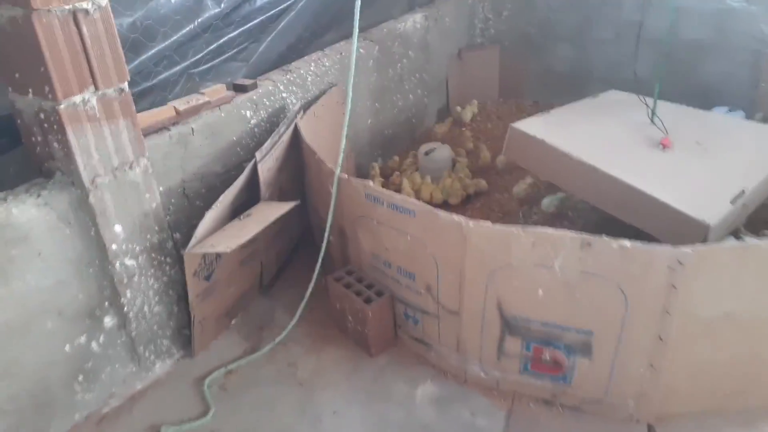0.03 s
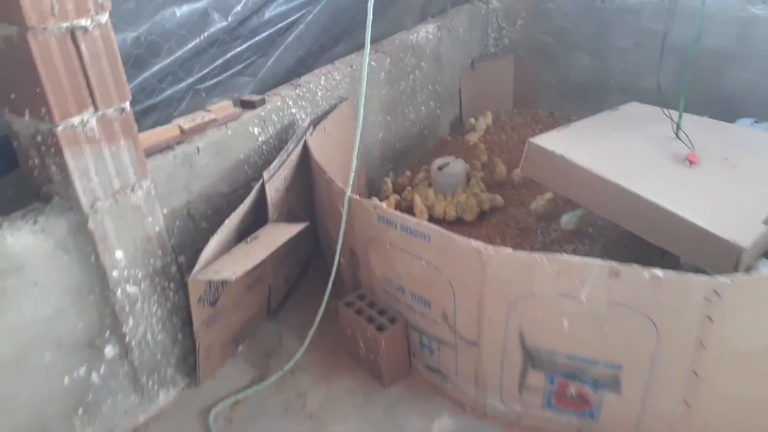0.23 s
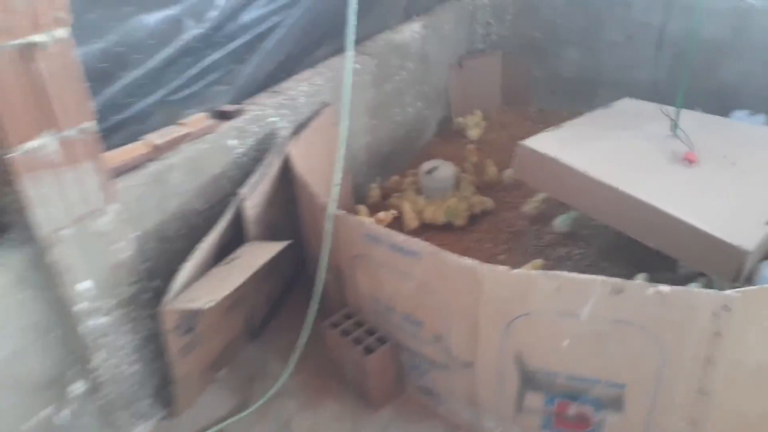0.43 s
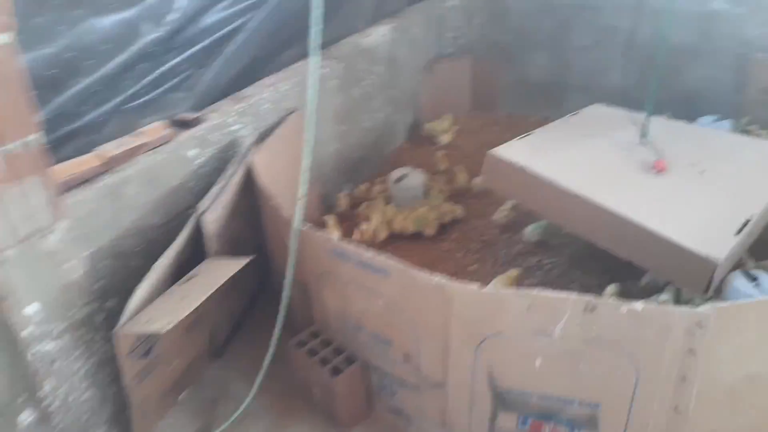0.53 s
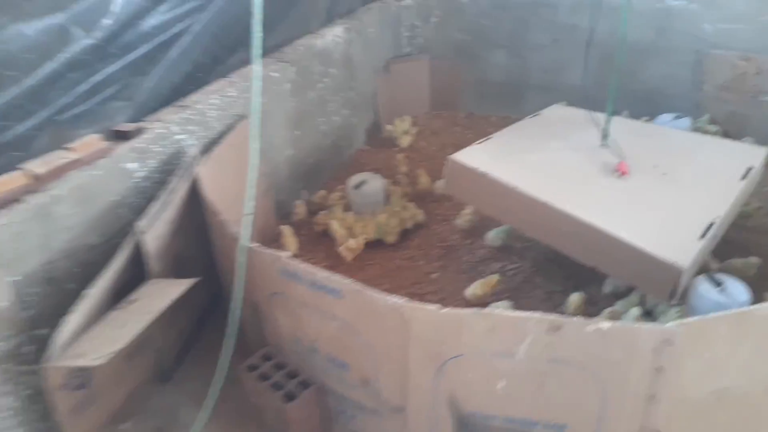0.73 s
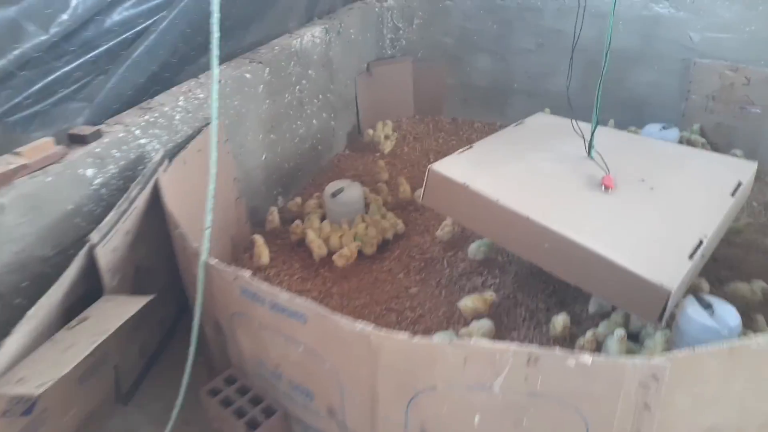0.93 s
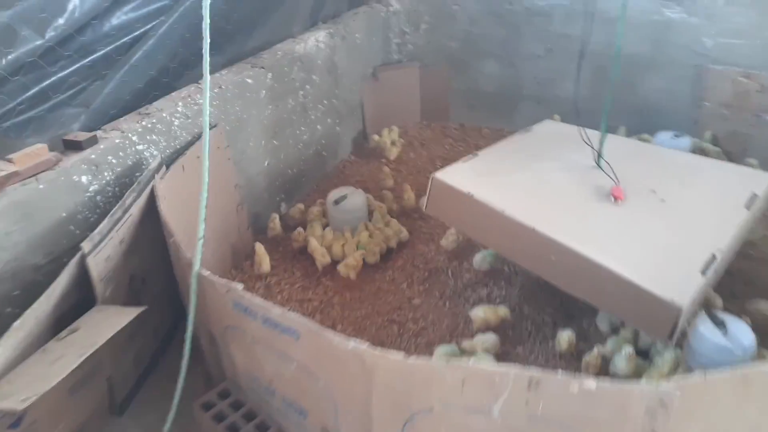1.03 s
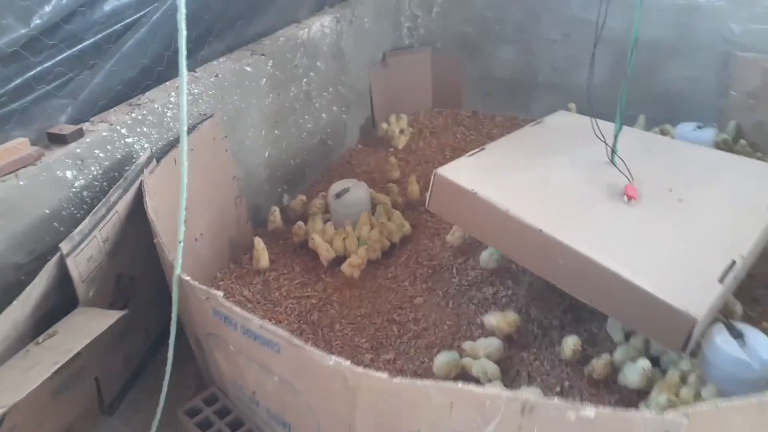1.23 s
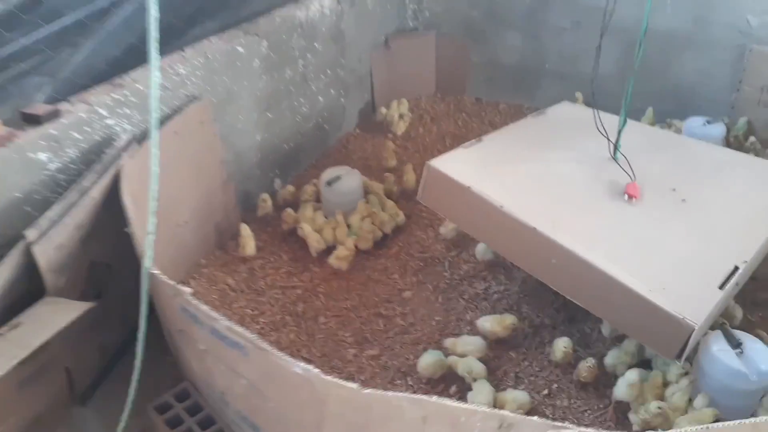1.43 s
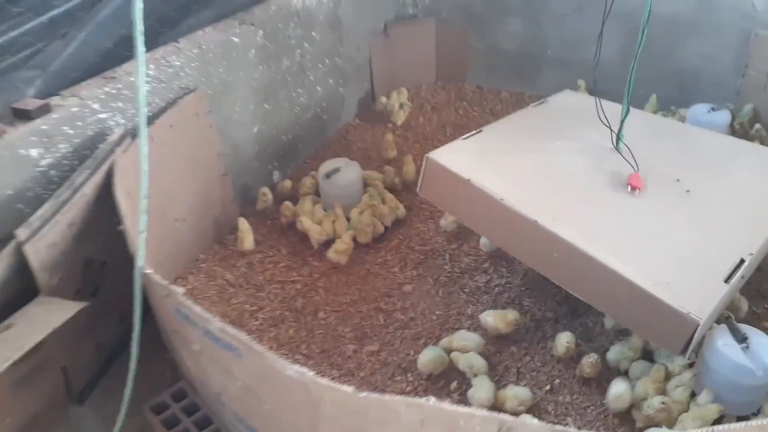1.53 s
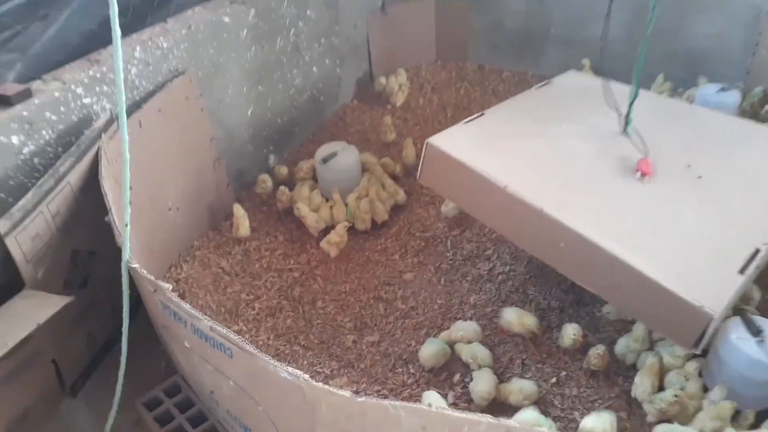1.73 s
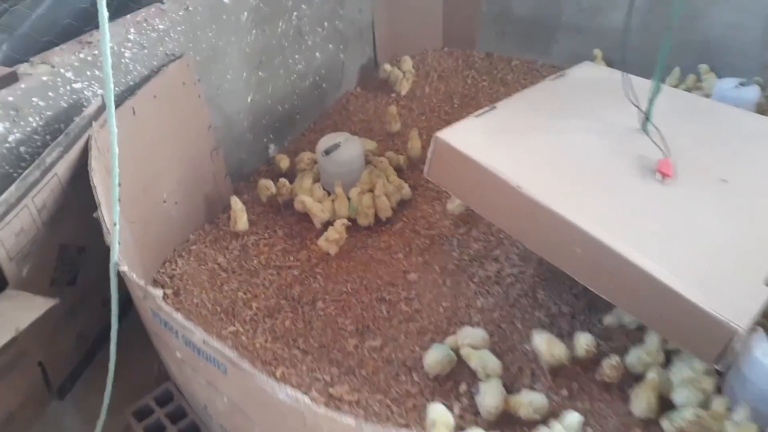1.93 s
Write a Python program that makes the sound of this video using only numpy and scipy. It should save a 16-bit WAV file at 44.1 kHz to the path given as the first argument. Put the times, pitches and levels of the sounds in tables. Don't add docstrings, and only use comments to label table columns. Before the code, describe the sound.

Constant chorus of baby chick peeps, short falling whistles and higher twitters, with short shed echo; light foot scuffs and gritty snaps, low air wash, distant engine drone and hiss, a soft microphone bump at the end.

```python
import sys
import numpy as np
from scipy import signal
from scipy.fft import rfft, irfft
from scipy.io import wavfile
from scipy.ndimage import uniform_filter1d

SR = 44100
rng = np.random.default_rng(int(sys.argv[2]) if len(sys.argv) > 2 else 0)


def magnitude_from_level(level_db):
    exponent = np.asarray(level_db, float) / 20
    return 10 ** exponent


def store_pcm(level_fs):
    pcm = np.round(np.clip(level_fs, -1, 1) * 32767).astype(np.int16)
    wavfile.write(sys.argv[1], SR, np.atleast_2d(pcm).T)


N = 88200

# start t/s, length t/s, top f/Hz, end f/Hz, level/dB
CHEEP_EVENTS = [(.212, 0.055, 3096, 2100, -41.5), (.33, 0.059, 3045, 2550, -43),
                (.368, 0.034, 3410, 2710, -44), (.392, 0.038, 2497, 2330, -31.5),
                (.4, 0.04, 2763, 2500, -42), (.405, 0.036, 2147, 1626, -43),
                (.562, 0.075, 4110, 2876, -42.5), (.63, 0.0696, 3364, 2905, -45.5),
                (.755, .05, 2900, 2600, -40), (.865, 0.046, 3300, 2420, -41), (.97, 0.045, 3443, 2950, -42),
                (1.028, 0.04, 2890, 2560, -39.5), (1.052, 0.042, 4300, 3530, -46),
                (1.11, .06, 2632, 1860, -52.5), (1.19, 0.1, 3080, 2640, -49.5),
                (1.315, 0.045, 3450, 3030, -43), (1.43, 0.066, 3310, 2760, -48.5),
                (1.53, 0.039, 2603, 2073, -46.5), (1.545, .06, 3590, 2970, -45),
                (1.615, .06, 3960, 3410, -41.5), (1.685, 0.056, 4070, 3600, -46),
                (1.7, 0.045, 2380, 1800, -55.5), (1.775, .045, 3220, 2456, -40.5),
                (1.915, 0.049, 3470, 2910, -41.5), (1.03, .035, 3120, 2800, -49),
                (.655, .05, 4240, 3850, -52), (.81, .06, 2658, 2350, -47), (.765, .04, 3200, 2800, -40),
                (1.36, .05, 3000, 2450, -50), (.69, .04, 2400, 2200, -54)]
# start t/s, length t/s, top f/Hz, level/dB, left over right level/dB
TWITTER_EVENTS = [(.125, 0.046, 4340, -40.5, -5), (.15, 0.079, 3750, -54, -4), (.16, 0.092, 4060, -52, -9),
                  (.335, 0.044, 4300, -47.5, -6), (.43, 0.055, 4400, -48.5, -4),
                  (.695, 0.101, 2816, -46, -1.5), (.905, 0.024, 1883, -52, -15),
                  (.925, 0.049, 4300, -45, -1), (1.068, 0.1, 4760, -54.5, -12.5),
                  (1.09, 0.073, 4200, -49.5, -3.5), (1.505, 0.097, 4200, -46.5, -7),
                  (1.595, 0.088, 4240, -49.5, -4), (1.785, 0.06, 4260, -51.5, -12.5),
                  (1.805, 0.057, 3290, -53, 7), (1.875, 0.12, 4500, -50, -1.5), (.385, .06, 4900, -50, -2),
                  (0.71, .035, 4200, -58, -1), (.91, .06, 4500, -55.5, -4), (1.225, .06, 4300, -57, -9),
                  (1.4, .05, 4240, -49, -4), (1.1, .05, 4200, -60, -4), (1.2, .04, 3400, -45, -7),
                  (1.39, 0.064, 4160, -57.5, -3), (1.9, .06, 8900, -59.5, 4), (1.73, .05, 1780, -57, -3),
                  (1.3, 0.063, 2060, -54, -9), (0.66, .03, 8300, -62, 0), (.11, 0.048, 6350, -61.5, -6),
                  (1.31, .03, 6400, -64, -1)]
# t/s, level/dB, pitch factor
BROOD_MOOD = [(0, -39.5, 0.97), (0.151, -39, 0.97), (.3, -39, 0.9), (0.452, -37, 1.04), (.54, -43.5, 0.96),
              (.62, -40, 1.104), (0.72, -39, 1.022), (0.85, -37.5, 0.99), (.97, -37.5, 1.027),
              (1.122, -39.5, 0.97), (1.251, -43, .92), (1.35, -38, 0.92), (1.43, -42.5, 0.95),
              (1.52, -40.5, .92), (1.62, -39.5, 1.114), (1.799, -35.5, 1.048), (2, -43, 1.04)]
# start t/s, rise t/s, fall t/s, level/dB
SCUFF_EVENTS = [(.14, 0.017, 0.028, -51), (.235, 0.005, 0.19, -48.5), (.36, 0.035, 0.056, -51),
                (.455, 0.012, 0.027, -71.5), (.9, 0.11, 0.11, -48.5), (1.051, 0.0037, 0.004, -32.5),
                (1.059, 0.0035, 0.025, -40.5), (1.102, 0.032, 0.04, -56), (1.34, 0.022, 0.04, -55),
                (1.438, 0.021, 0.064, -53.5), (1.78, 0.014, 0.069, -51.5), (1.949, 0.02, 0.028, -43)]
# f/Hz, level/dB
GRIT_COLOUR = [(800, -28), (2000, -2.5), (5000, -4), (7300, -11.5), (8800, -7), (11500, -10),
               (16000, -17.5)]
# t/s, peak level/dB, ring f/Hz, width f/Hz
SNAP_EVENTS = [(.234, -40, 8700, 5000), (.4599, -27.5, 1800, 1600), (.4599, -33, 3800, 2500),
               (.4599, -36, 8800, 4000), (1.03, -36, 8700, 5000), (1.0531, -29, 10500, 2500),
               (1.0539, -31, 13000, 3000), (1.0549, -25, 10600, 2000), (1.0563, -17.5, 8700, 1800),
               (1.0563, -29, 4800, 2500), (1.0569, -28, 13500, 4000), (1.0574, -24, 11300, 2500),
               (1.0612, -29, 7000, 6000), (1.0735, -32, 5500, 5000), (1.9584, -37, 8800, 4000),
               (.4655, -46, 1050, 400)]
# t/s, level/dB, f/Hz
BUMP_EVENTS = [
    (1.978, -34, 170),
    (1.986, -32.5, 262),
    (1.993, -26, 303),
]
# f/Hz, t60 t/s
SHED_DECAY = [(300, 1), (2000, 0.28), (5000, 0.11), (12000, 0.17)]
# f/Hz, level/dB
AIR_COLOUR = [(15, -57), (25, -19), (75, -3), (108, -9), (201, -8.5), (386, -17), (521, -12.5), (1170, -17),
              (1700, -20), (2210, -9.5), (3740, -120)]
# t/s, level/dB
AIR_SWELL_DB = [(0, 5), (.3, 1.5), (.8, -1), (1.2, 1.5), (2, -0.5)]
# f/Hz, correlation
AIR_LIKENESS = [(60, 0.95), (240, 0.91), (950, 0.13), (3770, -1.47), (15000, 0.02)]
# f/Hz, width f/Hz, level/dB
DRONE_BANDS = [(90, 11, -64), (123.7, 7.5, -62.5), (199.6, 20.8, -65), (488, 22, -69.5)]
# t/s, level/dB
FIRING_SWELL_DB = [(0, -3), (.15, -0.5), (.3, -3.5), (.5, -6), (.65, 1), (.9, 3.5), (1.06, -5), (1.25, -5),
                   (1.45, 2.5), (1.6, 3), (1.78, -3), (2, -2)]
# f/Hz, level/dB
HISS_COLOUR = [(1200, -8), (1800, -12.5), (4500, 5), (6000, -3), (7400, -8), (8600, -1.5), (12000, -7.5),
               (15500, -7.5)]
# f/Hz, left over right level/dB
HISS_BALANCE = [(1000, 6), (5000, 0), (9000, 3), (13000, 4)]

RISE_S, FALL_S, BEND, ARCH, WARBLE = .01, .015, 1.4, .07, .008
HOARSE, HOARSE_S, TWITTER_HOARSE, OVERTONE_DB = .7, .003, .5, -27
BROOD_PER_S, BROOD_SPREAD_DB, BROOD_LOW_HZ, BROOD_TOP_HZ, BROOD_DROP = 300, 7, 2150, 4450, .28
SIDE_DB, NEAR_WET_DB, FAR_WET_DB, EARLY_DB = -5, -1, 4, -1
GRAINS_PER_S, GRAIN_DB, SNAP_WET_DB, SNAP_EARLY_DB = 12000, -0.5, -7, -18
AIR_DB, HISS_DB, HISS_PATCH_DB = -49.5, -56, 1.6
FIRING_HZ, FIRING_WANDER_HZ, FIRING_DB = 72.6, 1.19, -52.5
EDGE_HZ, BASS_CUT_HZ = 15880, 34


def near():
    places, chance, flutter = np.zeros((6, 2, N)), rng.random((2, 30, 3)), unsteady()
    for k, (s, length_s, top_hz, end_hz, db) in enumerate(CHEEP_EVENTS):
        cheep = peep(fall(length_s, top_hz, end_hz), db, SIDE_DB, chance[0, k], flutter)
        add(places[k % 6], s, cheep)
    for k, (s, length_s, top_hz, db, left_db) in enumerate(TWITTER_EVENTS):
        arch = 1 - ARCH * np.linspace(-.9, 1, round(length_s * SR)) ** 2
        twitter = peep(top_hz * arch, db, left_db, chance[1, k], flutter * TWITTER_HOARSE)
        add(places[k % 6], s, twitter)
    return shed(places, NEAR_WET_DB)


def peep(hz, db, left_db, chance, flutter):
    t = np.arange(len(hz)) / SR
    warble_hz = 50 + 70 * chance[0]
    hz = hz * (1 + WARBLE * np.sin(2 * np.pi * (warble_hz * t + chance[1])))
    phase = 2 * np.pi * (np.cumsum(hz) / SR + chance[2])
    ramp = np.clip(np.minimum(t / RISE_S, (t[-1] - t) / FALL_S), 0, 1)
    envelope = np.sin(np.pi / 2 * ramp) ** 2
    wobble = 1 + HOARSE * flutter[round(chance[2] * N):][:len(t)]
    whistle = np.exp(1j * phase) + magnitude_from_level(OVERTONE_DB) * np.exp(2j * phase)
    tone = envelope * (wobble * whistle).real
    return tone * magnitude_from_level(db + 2.5 + np.array([[left_db / 2], [-left_db / 2]]))


def fall(length_s, top_hz, end_hz):
    return top_hz + (end_hz - top_hz) * np.linspace(0, 1, round(length_s * SR)) ** BEND


def unsteady():
    size = round(HOARSE_S * SR)
    noise = rng.standard_normal((2, 2 * N))
    a, b = uniform_filter1d(uniform_filter1d(noise, size), size)
    return (evened(a) + 1j * evened(b)) / np.sqrt(2)


def brood():
    lead, flutter = SR // 10, unsteady()
    total = N + lead
    places = np.zeros((6, 2, total))
    mood_s, mood_db, mood_pitch = np.transpose(BROOD_MOOD)
    for k, c in enumerate(rng.random((round(BROOD_PER_S * total / SR), 9))):
        s = c[0] * total / SR
        top_hz = BROOD_LOW_HZ + (BROOD_TOP_HZ - BROOD_LOW_HZ) * (.7 * c[1] + .3 * c[2])
        top_hz *= np.interp(s - .05, mood_s, mood_pitch)
        hz = fall(.04 + .05 * c[3], top_hz, top_hz * (.97 - BROOD_DROP * c[4]))
        add(places[k % 6], s, peep(hz, BROOD_SPREAD_DB * c[5], SIDE_DB, c[6:], flutter))
    crowd = evened(shed(places[..., lead:], FAR_WET_DB))
    return timed_gain(np.transpose([mood_s, mood_db])) * crowd


def feet():
    t, push = np.arange(N) / SR, np.zeros(N)
    for s, rise_s, fall_s, db in SCUFF_EVENTS:
        rise = np.clip((t - s) / rise_s, 0, 1)
        push += magnitude_from_level(db) * rise * np.exp(-np.maximum(t - s - rise_s, 0) / fall_s)
    size = magnitude_from_level(GRAIN_DB * rng.exponential(1, (2, N)))
    size *= rng.random((2, N)) < GRAINS_PER_S / SR
    scuffs = push * evened(colour(size * rng.standard_normal((2, N)), GRIT_COLOUR))
    snaps, click = np.zeros((2, N)), -1. * (np.arange(600) == 0)
    for s, db, hz, width_hz in SNAP_EVENTS:
        ring = resonate(resonate(click, hz, width_hz), hz, width_hz)
        add(snaps, s, ring / abs(ring).max() * magnitude_from_level(db + np.array([[-1.5], [1.5]])))
    return scuffs + shed([snaps], SNAP_WET_DB, SNAP_EARLY_DB, lags=[1, 0])


def bumps():
    out = np.zeros(N)
    for s, db, hz in BUMP_EVENTS:
        cycles = np.arange(-300, 600) / SR * hz
        push = np.exp(-(cycles / 0.19) ** 2)
        swing = 0.26 * np.exp(-((cycles - .65) / 0.57) ** 2)
        add(out, s - 300 / SR, magnitude_from_level(db) * (push - swing))
    return out


def air():
    a, b, c, d = rng.standard_normal((4, N))
    gusts = evened(smooth(rng.standard_normal(N), 3000))
    wash = magnitude_from_level(AIR_DB) * evened(colour(pair(a, b), AIR_COLOUR))
    out = wash * magnitude_from_level(1.42 * gusts) * timed_gain(AIR_SWELL_DB)
    for hz, width_hz, db in DRONE_BANDS:
        out += magnitude_from_level(db) * evened(resonate(resonate(pair(c, d), hz, width_hz), hz, width_hz))
    firing_hz = FIRING_HZ + FIRING_WANDER_HZ * evened(smooth(d, 4000))
    firing = np.sin(2 * np.pi * np.cumsum(firing_hz) / SR)
    out += magnitude_from_level(FIRING_DB + 3.0) * firing * timed_gain(FIRING_SWELL_DB)
    _, _, z = signal.stft(rng.standard_normal((2, N)), nperseg=512)
    patches = uniform_filter1d(rng.standard_normal(z.shape[1:]), 14, 0)
    patches = evened(uniform_filter1d(patches, 16, 1))
    hiss = signal.istft(z * magnitude_from_level(HISS_PATCH_DB * patches), nperseg=512)[1][:, :N]
    hiss = evened(colour(hiss, HISS_COLOUR))
    return out + magnitude_from_level(HISS_DB) * np.array([colour(hiss[0], HISS_BALANCE), hiss[1]])


def pair(x, y):
    same = np.clip(read(AIR_LIKENESS, np.fft.rfftfreq(N, 1 / SR)), -1, 1)
    return np.array([x, irfft(same * rfft(x) + np.sqrt(1 - same ** 2) * rfft(y), N)])


def shed(places, wet_db, early_db=EARLY_DB, lags=None):
    out, t = np.zeros((2, N)), np.arange(SR // 2) / SR
    for x in places:
        taps = rng.standard_normal((2, len(t))) * (rng.random((2, len(t))) < .05) * (t > .004)
        hz, at_s, z = signal.stft(taps, SR, nperseg=256)
        decay = magnitude_from_level(-60 * at_s / read(SHED_DECAY, hz)[:, None])
        tail = signal.istft(z * decay, SR, nperseg=256)[1]
        tail *= magnitude_from_level(wet_db) / np.linalg.norm(tail[0])
        spots = rng.integers(20, 900, (2, 6))
        echoes = magnitude_from_level(early_db - spots * 0.046) * rng.choice([-.5, .5], spots.shape)
        np.put_along_axis(tail, spots, echoes, 1)
        direct = rng.integers(0, 20, 2) if lags is None else lags
        tail[[0, 1], direct] = 1
        out += signal.fftconvolve(x, tail, axes=1)[:, :N]
    return out


def resonate(x, hz, width_hz):
    return signal.lfilter(*signal.iirpeak(hz, hz / width_hz, SR), x)


def colour(x, points):
    gain = magnitude_from_level(read(points, np.fft.rfftfreq(x.shape[-1], 1 / SR)))
    return irfft(rfft(x) * gain, x.shape[-1])


def read(points, hz):
    f, value = np.transpose(points)
    return np.interp(np.log(hz + 1), np.log(f + 1), value)


def timed_gain(points):
    return magnitude_from_level(np.interp(np.arange(N) / SR, *np.transpose(points)))


def smooth(x, size):
    return uniform_filter1d(uniform_filter1d(x, size), size)


def evened(x):
    return x / np.sqrt(np.mean(x ** 2) + 1e-20)


def add(mix, s, sound):
    part = mix[..., max(round(s * SR), 0):][..., :sound.shape[-1]]
    part += sound[..., :part.shape[-1]]


def scene():
    return near() + brood() + feet() + bumps() + air()


def top_cut(x):
    return signal.sosfilt(signal.butter(12, 16810, fs=SR, output="sos"), x)


def record(dry):
    low_pass = signal.firwin(511, EDGE_HZ, window=("kaiser", 9), fs=SR)
    mix = signal.oaconvolve(dry, low_pass[None], "same")
    mix = signal.sosfilt(signal.butter(2, BASS_CUT_HZ, "high", fs=SR, output="sos"), mix)
    return top_cut(mix)


dry = scene()
out = record(dry)
store_pcm(out)
```